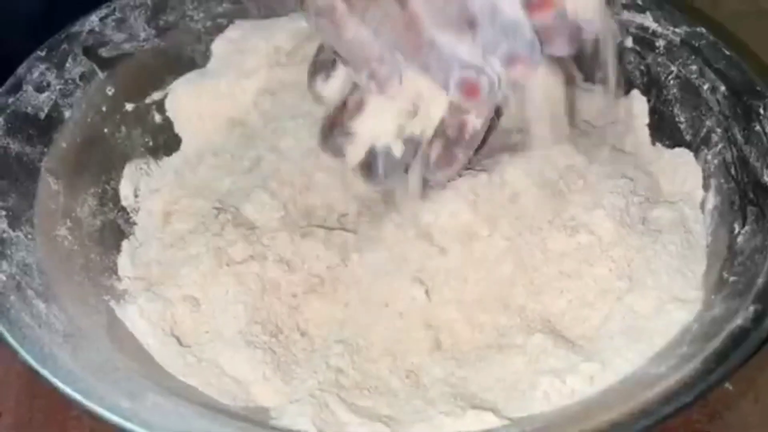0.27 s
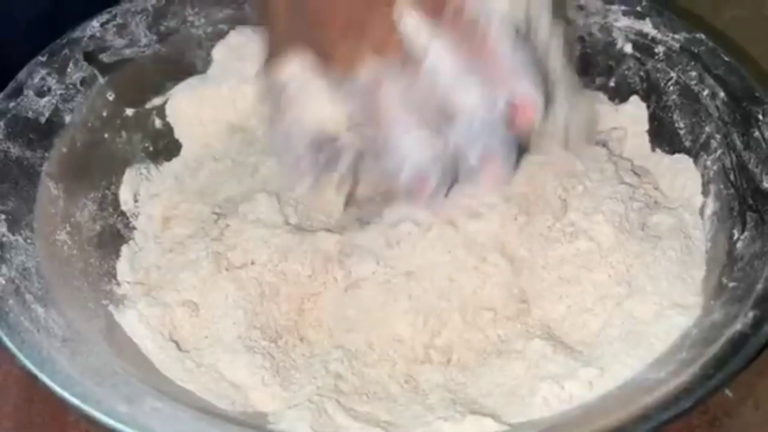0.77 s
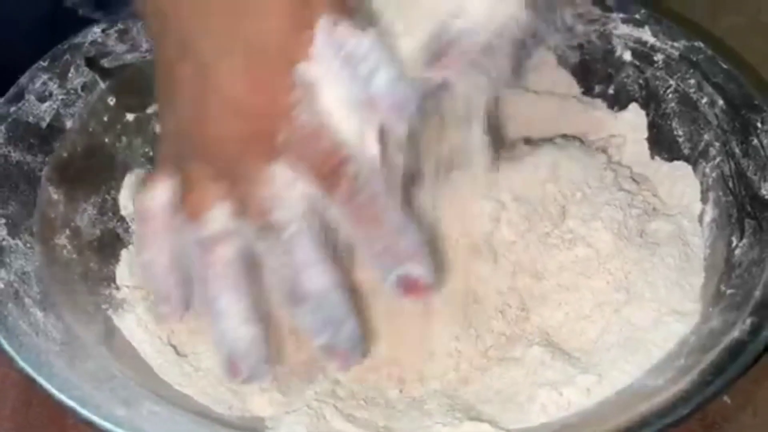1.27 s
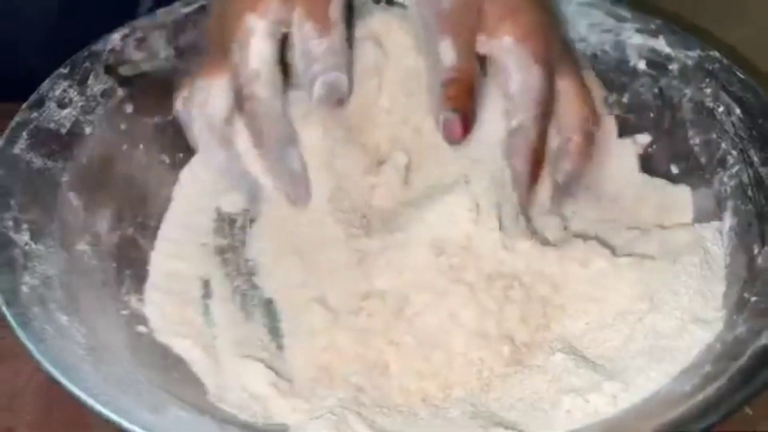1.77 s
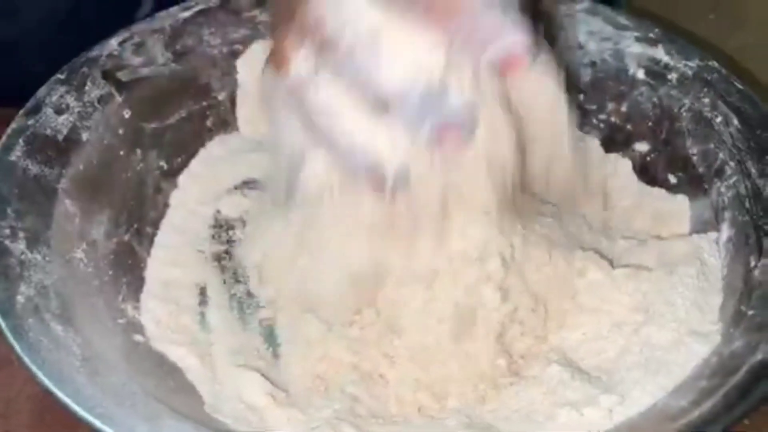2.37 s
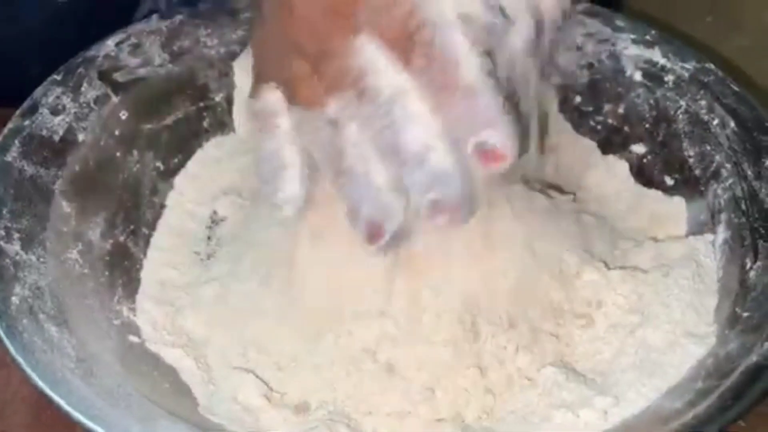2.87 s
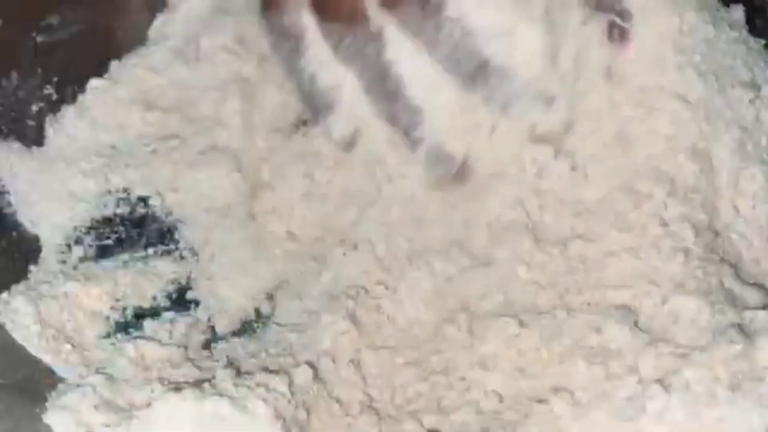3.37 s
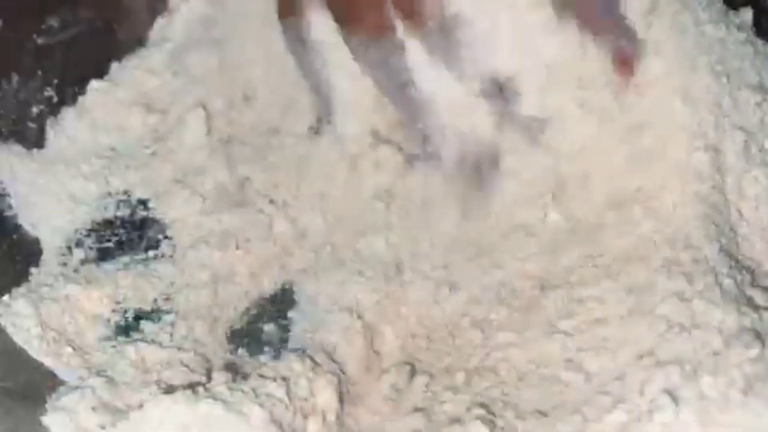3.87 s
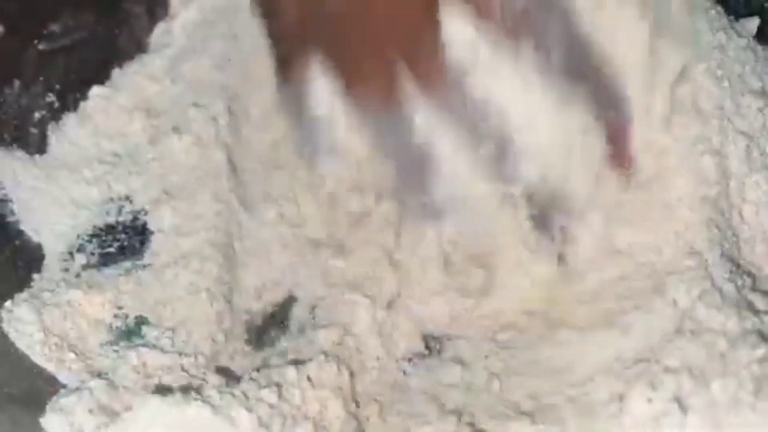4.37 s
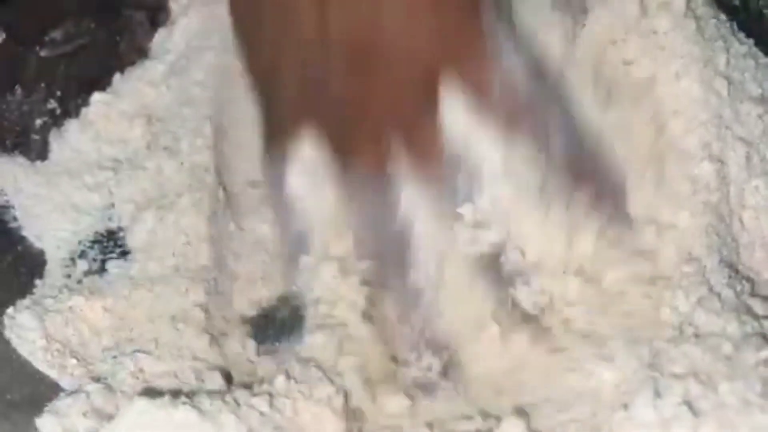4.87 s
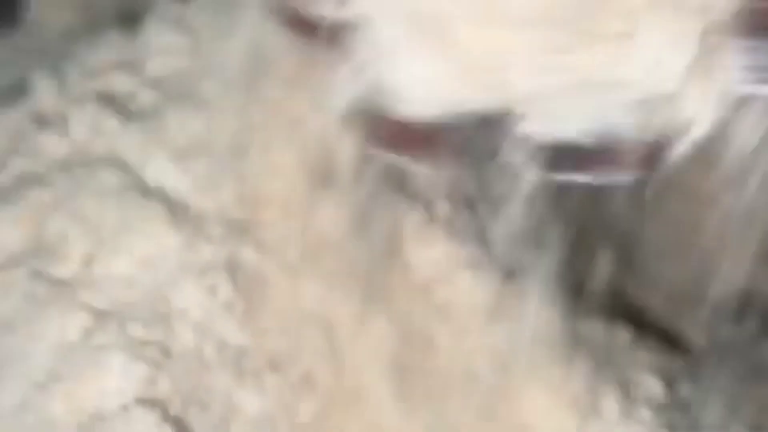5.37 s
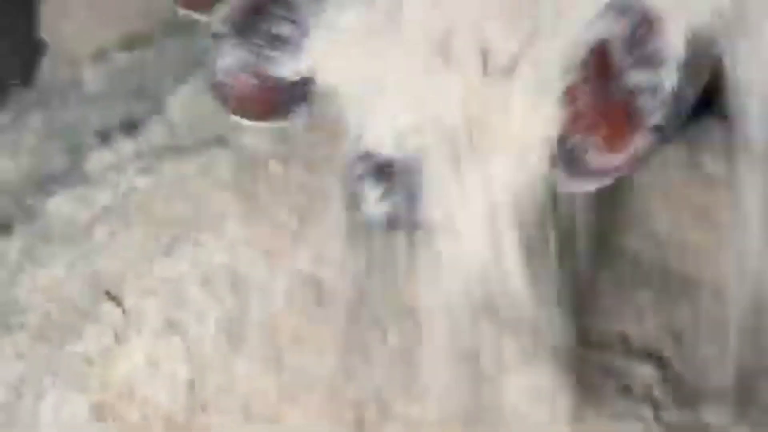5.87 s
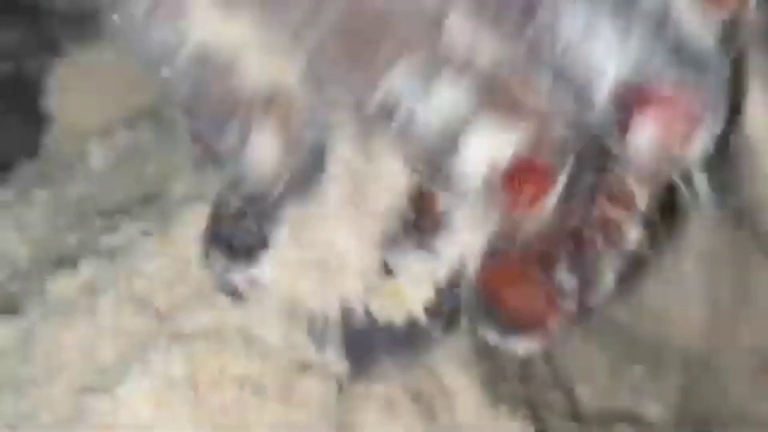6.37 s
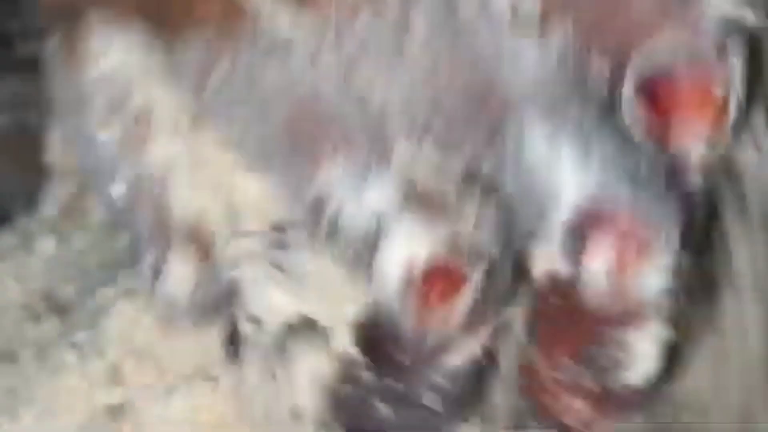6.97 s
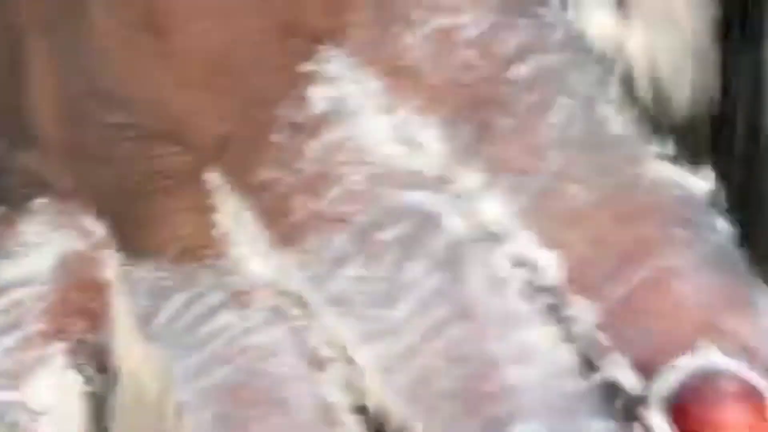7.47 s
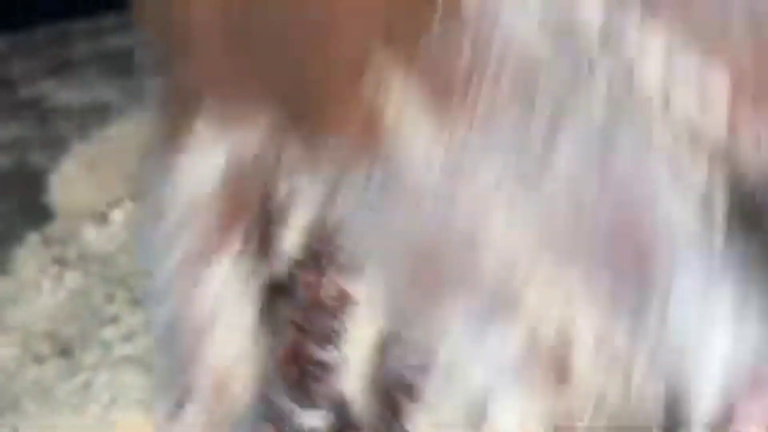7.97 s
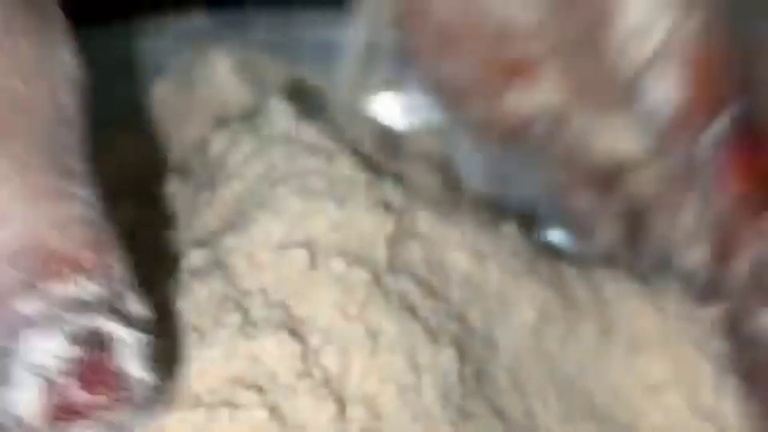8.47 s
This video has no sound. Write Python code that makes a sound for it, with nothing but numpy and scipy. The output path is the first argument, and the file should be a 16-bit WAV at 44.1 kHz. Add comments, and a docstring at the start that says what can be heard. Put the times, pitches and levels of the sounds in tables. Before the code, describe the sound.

Dry powdery rustle and crunch of flour worked by hand in a steel bowl, with dull thumps, a metallic scrape and a late sharp nail tick.

```python
"""Hands rub oil into flour in a steel bowl: they scoop it together, rake to and fro, then rub it between the palms.
Sliding powder fizzes and squeezed flour crunches: both are filtered trains of random slips, driven by the gestures.
Loose grains trickle as a peaked hiss; pats, breaking clods, soft thumps and short squeaks stand out singly.
Bare steel rings through the resonances of its wall, and a nail ticks on it, faintly twice and clearly near the end.
Underneath, the weight of the hands rumbles through the low resonances of the bowl on its table."""
import sys
import numpy as np
from scipy import signal
from scipy.fft import rfft, irfft
from scipy.io import wavfile

SR = 44100
rng = np.random.default_rng(int(sys.argv[2]) if len(sys.argv) > 2 else 0)


def transcribe(u):
    """Save the signal u as a 16-bit wav file named by the first command-line argument.

    u: samples, shape (n,) or (channels, n), limited to [-1, 1]; the rate is SR.
    q: integer samples, one column per channel.
    """
    v = np.clip(np.atleast_2d(u).T, -1, 1)
    q = np.round(v * 32767).astype(np.int16)
    wavfile.write(sys.argv[1], SR, q)


N = 383714
TIME = np.arange(N) / SR  # s
TAPS = 8192  # samples in the grid that filters are designed on
HZ = np.fft.rfftfreq(TAPS, 1 / SR)
CLOSE_FROM_S, PALMS_FROM_S = 3.05, 5.42  # the raking close by begins, then the rubbing between the palms
CONTACT_ATTACK_S = 0.032  # onset of a push and of the falling stream


def sliding(fizz_db):
    """Friction noise: powder slips fizz, fuller in a firm stroke; on bare steel such slips ring the wall."""
    # light fizz: (frequency [Hz], spectral level [dB])
    light_spectrum = [(1500, -25), (3000, -1), (4000, -4), (6200, -2), (9000, -3), (10500, -15.5),
                      (15000, -6.5)]
    # firm fizz: (frequency [Hz], spectral level [dB])
    firm_spectrum = [(1500, -30.5), (3000, -1.5), (4000, 0.5), (5000, 1), (6400, 3), (7500, 3),
                     (9300, -4.5), (10400, -3), (12000, 0), (15000, -5.5)]
    # fingers on bare steel: (time [s], share of the fizz power [0-1])
    bare_steel = [(1.3, 0.05), (1.39, 0.2), (1.5, 0.36), (1.7, 1), (1.9, 0.5), (2.1, 0.45), (2.3, 0.36),
                  (8.15, 0), (8.25, 0.5), (8.5, 0), (8.7, 0.9)]
    dust = clicks(10000, 2.7)
    loose = evened(colour(dust, hiss(light_spectrum, 8000, peak_db=1.5)))
    near = evened(colour(dust, hiss(light_spectrum, 7470, peak_db=1.5)))
    light = np.where(TIME < CLOSE_FROM_S, loose, near)
    firm = evened(colour(clicks(22000, 1.9), spectrum(firm_spectrum)))
    powder = blend(light, firm, np.interp(fizz_db, [-43, -31], [0, 1]))

    slips = clicks(14000, 2.2)
    first = evened(colour(slips, wall(2)))
    last = evened(colour(slips, wall(3)))
    rubbed = np.where(TIME < PALMS_FROM_S, first, last)
    # waves circling the wall break up each resonance
    steel = evened(echoed(rubbed, t60=0.2, wet_db=0))

    contact = blend(powder, steel, curves(bare_steel)[0])
    fizz = shifting(contact, patch_db=1.5, width_hz=1300, length_s=0.047)
    return fizz * amp(fizz_db + 3.7) * flutter(41, 0.52)


def wall(column):
    """Resonant response: gain of the rubbed steel wall, with the levels taken from one column of its table."""
    # wall modes, excited differently by place of touch, and a broad lift of the top treble near 11.6 kHz:
    # (frequency [Hz], width [Hz], level before the palm rubbing [dB], level after it begins [dB])
    wall_response = [(2240, 100, -3, -4), (3330, 150, -12, -12), (4760, 250, -7, -12), (5490, 240, 2, -6),
                     (5770, 130, -6, 8), (6830, 250, -1, -6), (7520, 380, 1.5, -4), (7890, 280, -2, 3),
                     (8400, 250, -2, -3), (9010, 350, -1, -3), (11600, 1700, -5, -1)]
    return resonances([(row[0], row[1], row[column]) for row in wall_response])


def crunching(crunch_db):
    """Stick-slip under load: dense dry slips under the fingers, with less low and high treble between the palms."""
    # crunch in the heap: (frequency [Hz], spectral level [dB])
    heap_spectrum = [(500, -9), (900, -4.5), (1300, -2), (1750, -2.5), (2250, -1.5), (2800, -5.5),
                     (3700, -7), (5200, -16.5), (9000, -25.5)]
    # crunch between the palms: (frequency [Hz], spectral level [dB])
    palm_spectrum = [(500, -7.5), (900, -6.5), (1300, -6), (1750, -5.5), (2250, -2.5), (2900, -2.5),
                     (3700, -7.5), (5200, -29), (9000, -36)]
    gather_from_s = 8.2  # the hands go back to the heap
    grit = shifting(clicks(5500, 2.4), patch_db=2.5, width_hz=310, length_s=0.06)
    heap = evened(colour(grit, spectrum(heap_spectrum)))
    palms = evened(colour(grit, spectrum(palm_spectrum)))
    between_palms = (TIME > PALMS_FROM_S) & (TIME < gather_from_s)
    return np.where(between_palms, palms, heap) * amp(crunch_db - 0.5) * flutter(33, 0.43)


def packing(deep_db):
    """Absorption by a granular layer: slips deep in the heap lose their treble in the flour above them."""
    # muffled crunch: (frequency [Hz], spectral level [dB])
    deep_spectrum = [(160, -23), (290, 4.5), (380, 1.5), (500, -1.5), (680, -4.5), (880, -9.5), (1300, -26),
                     (2600, -58)]
    grit = shifting(clicks(1800, 0.94), patch_db=4.5, width_hz=58, length_s=0.1)
    return evened(colour(grit, spectrum(deep_spectrum))) * amp(deep_db - 0.33)


def handwork():
    """Incoherent sources add in power: nominal levels in dB of fizz, crunch, muffled crunch and rumble."""
    # hands dig through the heap and gather it; levels before each layer's trim:
    # (time at the firmest [s], length [s], fizz [dB], crunch [dB], muffled crunch [dB])
    scoop_strokes = [(.065, 0.12, -46, -47, -50), (.16, 0.21, -70, -49, -45.5), (.27, 0.21, -46, -49, -64),
                     (.47, 0.21, -64, -42, -44), (.79, 0.38, -41, -37.5, -40),
                     (1.07, 0.52, -49.5, -43, -44), (1.485, 0.096, -36, -37.5, -42),
                     (1.655, 0.24, -25.5, -33.5, -47), (1.755, 0.2, -24.5, -48, -50),
                     (1.845, 0.19, -36.5, -34.5, -40.5), (1.995, 0.17, -33, -34, -40.5),
                     (2.19, 0.35, -60, -48, -47.5), (2.385, 0.21, -47.5, -38, -41.5),
                     (2.63, 0.28, -54, -46.5, -47.5), (2.81, 0.18, -49, -46.5, -44.5),
                     (3.01, 0.16, -56, -49.5, -54), (8.365, 0.13, -83, -65, -43),
                     (8.6, 0.17, -27.5, -28, -39), (8.685, 0.048, -26, -40, -37)]
    # flour settling between strokes, before trim: (fizz [dB], crunch [dB], muffled crunch [dB])
    rest_db = [-70, -69, -62]
    # handfuls of flour land on the heap, before trim: (time [s], length [s], muffled crunch [dB])
    landings = [(0.925, 0.31, -45.5), (1.3, 0.19, -50), (1.6, 0.29, -42), (2.308, 0.19, -39.5),
                (2.417, 0.25, -43), (3.996, 0.6, -46), (5.674, 0.087, -51), (6.118, 0.051, -62)]
    # weight of the hands on the bowl, before trim: (time [s], rumble [dB])
    leaning = [(0, -43), (.35, -45.5), (.55, -38.5), (1.15, -38), (1.45, -39), (1.8, -42), (2.1, -33.5),
               (3.02, -39.5), (3.08, -45), (3.65, -44.5), (4.0, -38), (4.3, -39.5), (5.15, -41),
               (5.38, -34.5), (5.52, -42), (6.03, -41.5), (6.25, -39.5), (6.85, -37.5), (7.15, -43),
               (7.5, -44), (7.8, -39), (8.22, -47.5), (8.37, -39), (8.7, -36.5)]
    shake_db = 9  # nominal rumble of a landing above its nominal crunch

    gestures = strokes(scoop_strokes, shape=2.18) + abrupt_onsets() + pushing() + pulling() + rubbing()
    fizz, crunch, deep = gestures + amp(rest_db)[:, None] ** 2
    fallen = sum((amp(db) * swell(s, length)) ** 2 for s, length, db in landings)
    rumble = amp(curves(leaning)[0]) ** 2 + amp(shake_db) ** 2 * fallen
    return 10 * np.log10([fizz, crunch, deep + fallen, rumble])


def strokes(rows, shape):
    """Friction power follows the stroke: one swell drives fizz, crunch and muffled crunch; returns their powers."""
    return sum((amp(levels_db)[:, None] * swell(s, length, shape)) ** 2 for s, length, *levels_db in rows)


def abrupt_onsets():
    """Transient envelope: sound sets in abruptly, then fades; powers of fizz, crunch and muffled crunch."""
    # abrupt onsets, before trim: (time [s], fading [s], fizz [dB], crunch [dB], muffled crunch [dB])
    onsets = [(1.388, 0.059, -42.5, -62, -62), (3.054, 0.064, -35.5, -34, -39.5),
              (5.437, 0.026, -42.5, -51, -59), (8.317, 0.055, -85, -61, -48)]
    attack_s = 0.004
    return sum((amp(levels_db)[:, None] * held(s, s, attack_s, fading)) ** 2 for s, fading, *levels_db in onsets)


def pushing():
    """Resistance grows with compaction: fingers fizz on entry, crunch harder, fizz at full reach and stop short."""
    # raking forwards, before trim: (start [s], length [s], fizz on entry [dB], fizz at full reach [dB],
    # crunch at the end [dB], muffled crunch at the end [dB])
    forward_rakes = [(3.461, 0.21, -54, -46, -36.5, -33.5), (4.017, 0.21, -64, -36, -35, -37.5),
                     (4.583, 0.19, -46, -31, -35, -36), (5.135, 0.19, -52, -37.5, -34, -35.5)]
    crunch_build_db, deep_build_db = 7.5, 10.5  # growth over one push
    power = np.zeros((3, N))
    for start, length, entry_db, reach_db, crunch_db, deep_db in forward_rakes:
        end = start + length
        contact = held(start, end, CONTACT_ATTACK_S, release_s=0.02)
        to_go = np.clip((end - TIME) / length, 0, 1)
        entry = amp(entry_db) * swell(start + 0.019, 0.12)
        reach = amp(reach_db) * swell(end - 0.032, 0.09)
        crunch = amp(crunch_db - crunch_build_db * to_go)
        deep = amp(deep_db - deep_build_db * to_go)
        fizz = entry + reach + amp(-16.5) * crunch  # crunching flour fizzes a little too
        power += (contact * np.array([fizz, crunch, deep])) ** 2
    return power


def pulling():
    """Friction noise rises with speed: a fast sweep back through the flour, then the furrows cave in."""
    # raking back, before trim: (time at the fastest [s], length [s], fizz [dB], fizz of the spill [dB])
    backward_rakes = [(3.211, 0.13, -29.5, -59), (3.789, .11, -29, -53.5), (4.342, 0.1, -29, -51.5),
                      (4.889, 0.1, -28, -52)]
    shape, lean = 2.43, 0.048  # a sweep gathers speed more slowly than it stops
    lag_s, drag_db = 0.015, [-3.5, -16.5]  # crunch and muffled crunch follow the fizz, at these relative levels
    spill_after_s, spill_s, spill_crunch_db, spill_deep_db = 0.11, 0.14, -45, -48
    power = np.zeros((3, N))
    for s, length, db, spill_db in backward_rakes:
        sweep = swell(s, length, shape, lean)
        drag = swell(s + lag_s, 1.17 * length, shape)
        crunch, deep = amp(drag_db)[:, None] * drag
        power += (amp(db) * np.array([sweep, crunch, deep])) ** 2
        spill_gain = amp([spill_db, spill_crunch_db, spill_deep_db])[:, None]
        power += (spill_gain * swell(s + spill_after_s, spill_s)) ** 2
    return power


def rubbing():
    """Sliding friction in strokes of the palms, plus the steady noise of a thin stream of flour that starts earlier."""
    # one palm slides over the other, before trim:
    # (time at the fastest [s], length [s], fizz [dB], crunch [dB], muffled crunch [dB])
    palm_strokes = [(5.49, 0.32, -56, -45.5, -49.5), (5.64, 0.19, -50.5, -45, -53),
                    (5.81, 0.26, -46.5, -47, -51), (6.14, 0.28, -52.5, -48.5, -45.5),
                    (6.38, 0.32, -47.5, -46.5, -48), (6.58, 0.27, -45, -53, -59),
                    (6.75, 0.29, -45, -44.5, -44.5), (6.975, 0.25, -40, -47, -51.5),
                    (7.27, 0.22, -43.5, -44, -72), (7.42, 0.22, -44, -44, -47.5),
                    (7.68, 0.3, -39.5, -41.5, -56.5), (8.0, 0.24, -40.5, -37.5, -46.5)]
    # a thin stream of flour falls, from late in the raking to the end of the rubbing, before trim:
    # (fizz [dB], crunch [dB], muffled crunch [dB])
    stream_db = [-57.5, -60.5, -80]
    stream = amp(stream_db)[:, None] * held(4.9, 8.08, CONTACT_ATTACK_S, release_s=0.058)
    return strokes(palm_strokes, shape=2.4) + stream ** 2


def trickling():
    """Granular flow: many small impacts of loose grains make a hiss whose peak differs from spill to spill."""
    # loose flour slips off the fingers; levels stand 4 dB below the output:
    # (time [s], length [s], fizz [dB], peak frequency [Hz])
    spills = [(.245, 0.084, -42.5, 8050), (0.392, 0.2, -43, 7900), (0.638, 0.071, -36, 8160),
              (0.723, 0.0098, -31.5, 9200), (1.049, 0.059, -37, 8150), (1.15, 0.073, -39.5, 8150),
              (1.285, 0.033, -54, 8150), (1.44, 0.054, -41, 5370), (2.387, 0.065, -43, 8700),
              (2.734, 0.15, -53, 8400), (3.027, 0.054, -43, 7950), (3.744, 0.026, -36, 7000),
              (4.062, 0.088, -43, 7400), (5.137, 0.061, -42.5, 7500), (5.502, 0.19, -43.5, 8700),
              (5.613, 0.008, -43, 7200), (5.81, 0.09, -44, 7000), (6.11, 0.15, -50.5, 8650),
              (6.347, 0.12, -36.5, 7500), (7.64, 0.098, -39, 7500), (8.006, 0.14, -39, 8000),
              (8.497, 0.16, -48, 7160), (8.642, 0.11, -42, 8100)]
    # trickle: (frequency [Hz], spectral level [dB])
    trickle_spectrum = [(2500, -17), (5000, -8.5), (7000, -12), (11800, -8), (15000, -9)]
    grains = shifting(clicks(7000, 2.8), patch_db=2.2, width_hz=600, length_s=0.05) * flutter(60, 1.0)
    out = np.zeros((2, N))
    for s, length, db, hz in spills:
        near = abs(TIME - s) < 2 * length
        spill = evened(colour(grains[:, near], hiss(trickle_spectrum, hz, peak_db=2.0)))
        out[:, near] += spill * amp(db + 4.0) * swell(s, length)[near]
    return out


def hiss(points, peak_hz, peak_db):
    """Power sum of the broad spectrum of running powder and one bright resonance, as a gain."""
    return np.hypot(spectrum(points), resonances([(peak_hz, 1080, peak_db)]))


def pats():
    """Inelastic impact: each pat crushes the top of the heap."""
    # fingertips and lumps pat the heap:
    # (time [s], rms level before the envelope [dB], pitch [Hz], decay to 1/e [s])
    pat_events = [(0.676, -39.5, 760, 0.061), (0.805, -32, 376, 0.02), (0.912, -31, 330, 0.014),
                  (0.945, -33, 620, 0.02), (1.298, -51, 1500, 0.0061), (1.456, -24.5, 675, 0.0081),
                  (1.6, -36.5, 1030, 0.056), (1.845, -35, 714, 0.017), (1.888, -33, 343, 0.021),
                  (2.262, -38, 500, 0.011), (2.334, -46, 500, 0.017), (2.555, -44, 450, 0.018),
                  (3.605, -37, 450, 0.026), (3.646, -41, 520, 0.015), (8.314, -52, 1300, 0.057),
                  (8.464, -39, 540, 0.011), (8.577, -34, 1090, .03), (8.671, -23, 1190, 0.013)]
    out = np.zeros(N)
    for s, *pat in pat_events:
        add(out, s, crush(*pat))
    return out


def clods(crunch_db):
    """Random fracture: while the hands scoop, oily clods break, louder the harder the hands dig."""
    per_s, low_hz, high_hz = 16, 400, 2200
    largest_db, spread_db = 6, 9  # the largest clod above the nominal crunch, and the range below it
    out = np.zeros(N)
    draws = rng.random((int(CLOSE_FROM_S * per_s), 3))
    for slot, (when, smallness, pitch) in enumerate(draws):
        s = (slot + when) / per_s
        db = crunch_db[int(s * SR)] + largest_db - spread_db * smallness
        add(out, s, crush(db, low_hz * (high_hz / low_hz) ** pitch, decay=0.007))
    return out


def crush(db, hz, decay):
    """Heavily damped resonance: a little flour gives way at once with a dull, crumbly knock."""
    t = np.arange(SR // 4) / SR
    gain = resonances([(hz, 0.83 * hz, 0)]) ** 2
    crumbs = evened(colour(rng.standard_normal((1, len(t))), gain))[0]
    return amp(db) * crumbs * (1 - np.exp(-t / 0.0033)) * np.exp(-t / decay)


def thumps():
    """Cushioned impact: a soft rise and the dying cycles of a damped oscillator."""
    # soft blows of hand and falling flour: (time [s], level 7.5 dB above the peak [dB], pitch [Hz], T60 [s])
    blows = [(0.482, -15.5, 115.6, 0.14), (0.898, -25, 173, 0.1), (1.268, -12, 116.2, 0.3),
             (1.316, -10, 119.9, 0.28), (1.456, -17, 336, 0.022), (1.892, -16, 244, 0.039),
             (2.194, -16, 74, 0.099), (2.256, -15, 180, 0.066), (2.327, -22, 95, .12),
             (2.764, -16, 72.4, 0.46), (2.968, -12.5, 145, 0.04), (3.008, -17.5, 129, 0.068),
             (3.96, -30, 132, 0.15), (4.499, -25, 65, 0.28), (4.832, -24, 110, 0.25),
             (5.363, -19, 114, 0.15), (6.871, -18.5, 76.4, 0.31), (7.094, -28, 71.6, 0.22),
             (8.385, -25, 97, 0.082), (8.577, -13.5, 493, 0.021), (8.672, -12, 760, 0.0067)]
    out = np.zeros(N)
    t = np.arange(SR // 3) / SR
    for s, db, hz, t60 in blows:
        rise = 1 - np.exp(-t * hz / 0.38)
        swing = np.sin(2 * np.pi * hz * t) * rise * amp(-60 * t / t60)
        add(out, s, amp(db - 7.5) * swing / abs(swing).max())
    return out


def squeaks():
    """Stick-slip oscillation: short runs of slips that gather loosely round a gliding pitch."""
    # packed flour or bare steel squeaks under a finger: (time at the loudest [s], rms level before the envelope [dB],
    # pitch [Hz], length [s], glide [octaves per s], spread to each side of the pitch [Hz])
    squeak_events = [(0.554, -42.5, 1090, 0.05, 2, 190), (0.68, -34, 1420, 0.011, 4.5, 89),
                     (0.832, -41.5, 1100, 0.043, -7.5, 157), (0.948, -42, 1200, 0.025, 0, 150),
                     (2.19, -50, 6570, 0.062, 0.5, 300), (2.79, -45, 3700, 0.025, 0, 280),
                     (5.986, -52, 1500, .03, 1.5, 130), (6.003, -49.5, 1820, 0.043, 2, 130),
                     (6.044, -50.5, 973, 0.057, -1.5, 100), (8.229, -64, 2090, 0.089, 0.5, 130),
                     (8.26, -61, 5720, 0.027, 0.5, 220), (8.306, -55, 5780, .006, 0, 150),
                     (8.32, -61, 5850, .016, -2, 152), (8.615, -22, 2050, 0.009, -3.5, 200)]
    out = np.zeros(N)
    t = np.arange(SR // 4) / SR - 1 / 8
    for s, db, hz, length, glide, width_hz in squeak_events:
        carrier = np.exp(2j * np.pi * np.cumsum(hz * 2 ** (glide * t)) / SR)
        run = (carrier * (0.5 + wavering(width_hz, size=len(t)))).real
        add(out, s + t[0], amp(db) * run / run.std() * np.exp(-2 * (t / length) ** 2))
    return out


def nail():
    """Bending-wave dispersion: a thin tick crosses the steel treble first, scatters, and leaves the wall ringing."""
    # nail on the wall: (time [s], peak level of the direct tick [dB])
    nail_ticks = [(1.3645, -39), (1.3845, -38), (8.408, -9.5)]
    # tick: (frequency [Hz], spectral level [dB])
    tick_spectrum = [(500, -34), (1500, -28), (2400, -16), (3800, -19), (4500, -13), (5100, -2), (6200, -4),
                     (7400, 1), (9500, -8), (11500, -9), (16000, -20)]
    # what rings on after a tick: (frequency [Hz], level [dB], T60 [s])
    lingering_tones = [(2200, -28, .13), (2255, -33, .4), (4339, -43, .08), (4995, -29, .035),
                       (5690, -36, .06), (7192, -37, .06), (7854, -39, .07)]
    travel_s, travel_hz = 0.002, 7000  # a wave of this pitch takes this long through the wall
    t = np.arange(TAPS) / SR
    phase = -4 * np.pi * travel_s * np.sqrt(travel_hz * HZ)
    tick = irfft(spectrum(tick_spectrum) * np.exp(1j * phase))
    scatter = amp(-27) * rng.standard_normal(TAPS) * np.exp(-t / 0.004) * (t > 0.0008)
    chatter = tick + signal.fftconvolve(tick, scatter)[:TAPS]

    linger = np.zeros(TAPS)
    for hz, db, t60 in lingering_tones:
        uneven = 0.75 + 0.6 * wavering(70, size=TAPS)
        linger += (np.exp(2j * np.pi * hz * t) * uneven).imag * amp(db - 60 * t / t60)
    sound = chatter / abs(tick).max() + linger * np.clip(t / travel_s - 1, 0, 1)

    out = np.zeros(N)
    for s, db in nail_ticks:
        add(out, s, amp(db) * sound)
    return out


def rumbling(rumble_db):
    """Forced vibration: lumps and shifting weight drive the loaded bowl, with a deeper tilt once the hands are close."""
    # driving force: (frequency [Hz], spectral level [dB])
    rumble_spectrum = [(20, -33), (35, -1.5), (55, -2), (80, -2), (130, -2), (200, -1.5), (270, -1.5),
                       (420, -18.5)]
    # low modes of the loaded bowl on its table: (frequency [Hz], width [Hz], level [dB])
    bowl_modes = [(71, 10.3, 2.5), (109.8, 5.4, 5), (137, 13, -4), (179.6, 30.3, -2)]
    gain = spectrum(rumble_spectrum) * resonances(bowl_modes)
    lumps = clicks(1200, 3.8)
    octaves = np.log2(HZ / 100 + 0.05)  # roughly octaves above 100 Hz
    tilts_db = 1.2, -0.5, -2.8  # per octave: scooping, raking, between the palms
    stages = [evened(colour(lumps, gain * amp(tilt_db * octaves))) for tilt_db in tilts_db]
    return by_stage(*stages) * amp(rumble_db + 2.0) * flutter(3.1, 1)


def clicks(per_s, spread_db):
    """Shot noise: tiny slips of uneven size, each at its own place between left and right; mid and side."""
    size = amp(spread_db * np.minimum(rng.exponential(1, N), 4)) * (rng.random(N) < per_s / SR)
    return size * np.array([rng.choice([-1., 1.], N), rng.standard_normal(N)])


def flutter(per_s, depth_db):
    """Slow random modulation: the unsteadiness of a contact, as a gain."""
    low_pass = 1 / (1 + (np.fft.rfftfreq(N, 1 / SR) / per_s) ** 4)
    slow = irfft(rfft(rng.standard_normal(N)) * low_pass, N)
    return amp(depth_db * slow / slow.std())


def shifting(pair, patch_db, width_hz, length_s):
    """Time-varying filter: the contact keeps changing shape, so patches of its spectrum swell and fade."""
    z = signal.stft(pair, nperseg=512, noverlap=384)[2]
    across = np.fft.fftfreq(z.shape[1], SR / 512)
    along = np.fft.fftfreq(z.shape[2], 128 / SR)
    smooth = np.exp(-(across[:, None] * width_hz) ** 2 - (along * length_s) ** 2)
    patches = np.fft.ifft2(np.fft.fft2(rng.standard_normal(z.shape[1:])) * smooth).real
    gain = amp(patch_db * patches / patches.std())
    return signal.istft(z * gain / np.sqrt(np.mean(gain ** 2)), nperseg=512, noverlap=384)[1][:, :N]


def wavering(width_hz, size):
    """Narrow-band noise envelope: random wander of strength and phase round a pitch, rms 1."""
    low_pass = signal.butter(2, width_hz, fs=SR, output="sos")
    stray = signal.sosfilt(low_pass, [1, 1j] @ rng.standard_normal((2, size)))
    return stray / stray.std()


def echoed(pair, t60, wet_db):
    """Reverberation: adds an exponentially dying tail of sparse reflections to each channel."""
    t = np.arange(SR // 2) / SR
    arrivals = rng.standard_normal((2, len(t))) * (rng.random((2, len(t))) < 2000 / SR)
    tail = arrivals * amp(-60 * t / t60) * (t > 0.002)
    wet = signal.oaconvolve(pair, tail / np.linalg.norm(tail[0]), axes=1)[:, :N]
    return pair + amp(wet_db) * wet


def swell(s, length, shape=2, lean=0):
    """Speed of a stroke as a gain that peaks at s; shape 2 is a bell, more is flatter; lean lengthens the rise."""
    span = length * (1 - lean * np.sign(TIME - s))  # between the 1/e points
    return np.exp(-np.minimum(abs(2 * (TIME - s) / span), 6) ** shape)


def held(start, end, attack_s, release_s):
    """Envelope of a contact that sets in, lasts and lets go, as a gain."""
    before, after = np.maximum(start - TIME, 0), np.maximum(TIME - end, 0)
    return np.exp(-(before / attack_s) ** 2 - (after / release_s) ** 2)


def resonances(modes):
    """Power sum of damped resonators: gain at every frequency from (Hz, width, dB) modes."""
    power = 0
    for hz, width, db in modes:
        detuning = (HZ ** 2 - hz ** 2) / (width * HZ + 1e-9)
        power = power + amp(db) ** 2 / (1 + detuning ** 2)
    return np.sqrt(power)


def spectrum(points):
    """Spectral envelope: gain at every frequency from (Hz, dB) points, joined along log frequency."""
    hz, db = np.transpose(points)
    return amp(np.interp(np.log(HZ + 1), np.log(hz), db))


def colour(x, gain):
    """Minimum-phase filter with the given gain: it is causal, so each click rings after it lands."""
    log_gain = np.log(np.maximum(gain, 1e-5))
    circle = np.concatenate([log_gain, log_gain[-2:0:-1]])
    ring = np.fft.ifft(np.exp(np.conj(signal.hilbert(circle)))).real[:TAPS // 2]
    return signal.oaconvolve(x, ring[None], axes=1)[:, :x.shape[1]]


def evened(pair):
    """Normalization: scales a mid-side pair so that its mid has rms 1."""
    return pair / np.sqrt(np.mean(pair[0] ** 2) + 1e-20)


def blend(a, b, share):
    """Crossfade of equal power between two unrelated sounds."""
    share = np.clip(share, 0, 1)
    return np.sqrt(1 - share) * a + np.sqrt(share) * b


def by_stage(scooping, raking, palms):
    """Piecewise choice: one sound for the scooping, one for the raking, one from the palm rubbing on."""
    return np.select([TIME < CLOSE_FROM_S, TIME < PALMS_FROM_S], [scooping, raking], palms)


def curves(rows):
    """Linear interpolation: the columns of a timed table at every sample."""
    s, *columns = np.transpose(rows)
    return [np.interp(TIME, s, c) for c in columns]


def amp(db):
    """Level to amplitude: decibels to gain."""
    return 10 ** (np.asarray(db) / 20)


def add(mix, s, sound):
    """Superposition: mixes a sound in at a time."""
    part = mix[round(s * SR):][:len(sound)]
    part += sound[:len(part)]


def scene():
    """Superposition in mid and side: the flour is wide at first and nearly central once the hands are close."""
    # stereo width with the whole bowl in play: (frequency [Hz], side gain [dB])
    wide_spectrum = [(60, -15), (200, -11), (400, -5), (750, 2), (1600, 1), (2300, -4), (3000, -1),
                     (4200, -4), (5500, 0), (7000, -2), (8400, -8), (12000, -14)]
    # stereo width with the hands raking close by: (frequency [Hz], side gain [dB])
    close_spectrum = [(60, -20), (200, -13), (450, -11), (950, -7), (1600, -8), (2300, -15), (3200, -9),
                      (4200, -18), (8500, -28)]
    # stereo width from the palm rubbing on: (frequency [Hz], side gain [dB])
    closest_spectrum = [(60, -20), (200, -13), (950, -8), (1600, -8), (2300, -25), (3200, -21), (4200, -30)]
    fizz_db, crunch_db, deep_db, rumble_db = handwork()
    flour = sliding(fizz_db) + crunching(crunch_db) + packing(deep_db) + trickling()
    mid, side = flour + rumbling(rumble_db)
    widths = wide_spectrum, close_spectrum, closest_spectrum
    side = by_stage(*[colour(side[None], spectrum(width))[0] for width in widths])
    mid = mid + pats() + clods(crunch_db) + thumps() + squeaks() + nail()
    return np.array([mid + side, mid - side])


def record(dry):
    """Phase and band limits: left lags right in the top treble, the deepest bass is cut, the level dips twice briefly."""
    # lag of left behind right: (frequency [Hz], lag [cycles])
    treble_lag = [(8800, 0), (9550, .3), (9850, .49), (10550, .51), (11000, .75), (11800, .99),
                  (12700, 1.01), (13100, 1.2), (13350, 1.49), (14200, 1.51), (14600, 1.75), (15300, 1.85)]
    # brief dips of the level: (time [s], length [s])
    dips = [(3.051, 0.01), (5.418, 0.017)]
    edge_hz = 15250  # the treble ends here
    lag = np.interp(np.fft.rfftfreq(N, 1 / SR), *np.transpose(treble_lag))
    turned = irfft(rfft(dry) * np.exp(1j * np.pi * np.array([-lag, lag])), N)
    heard = signal.sosfilt(signal.butter(3, 33, "highpass", fs=SR, output="sos"), turned)
    gate = np.prod([1 - 0.82 * np.exp(-(2 * (TIME - s) / length) ** 4) for s, length in dips], axis=0)
    low_pass = signal.firwin(511, edge_hz, window=("kaiser", 9), fs=SR)
    return signal.oaconvolve(heard * gate, low_pass[None], "same")


dry = scene()
out = record(dry)
transcribe(out)
```